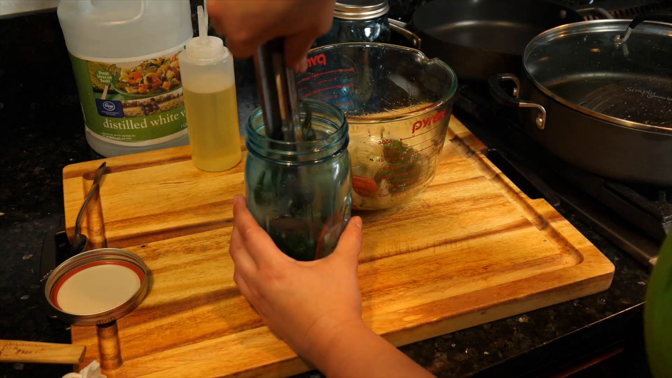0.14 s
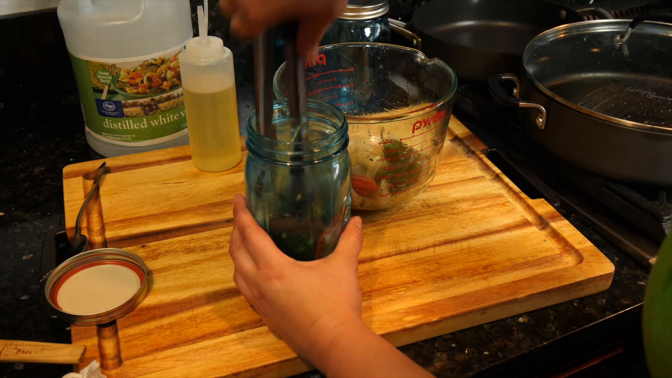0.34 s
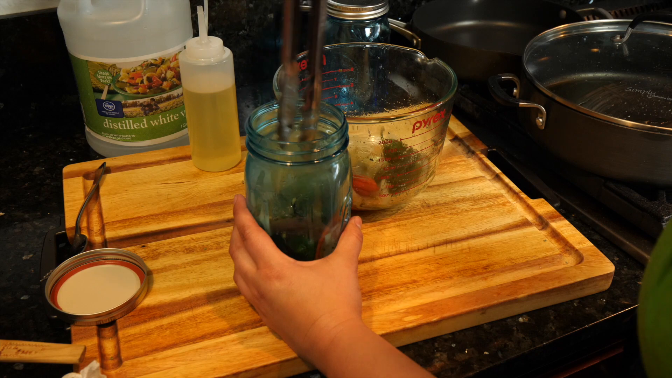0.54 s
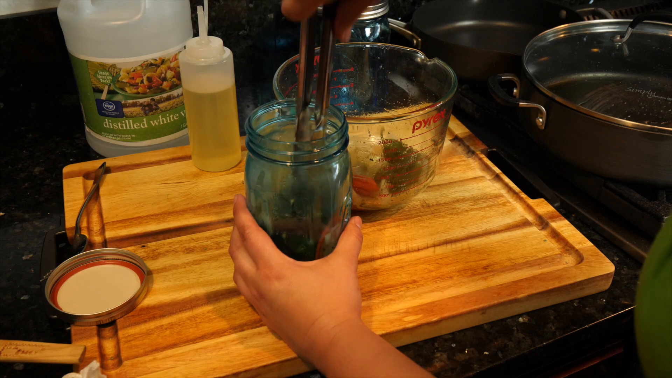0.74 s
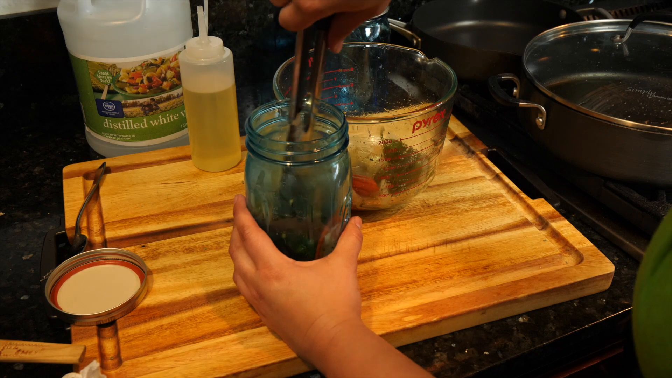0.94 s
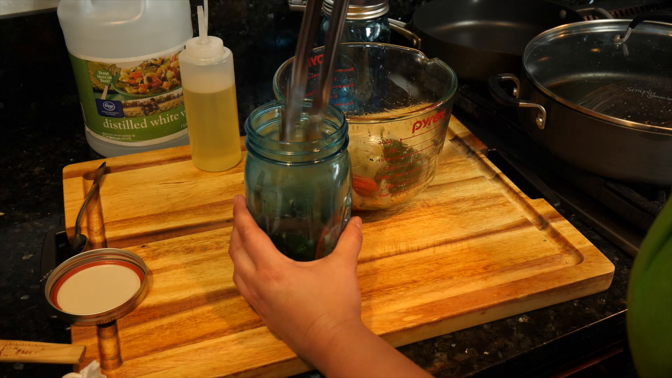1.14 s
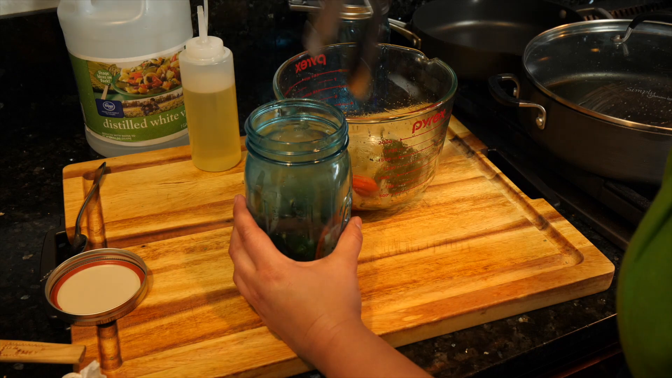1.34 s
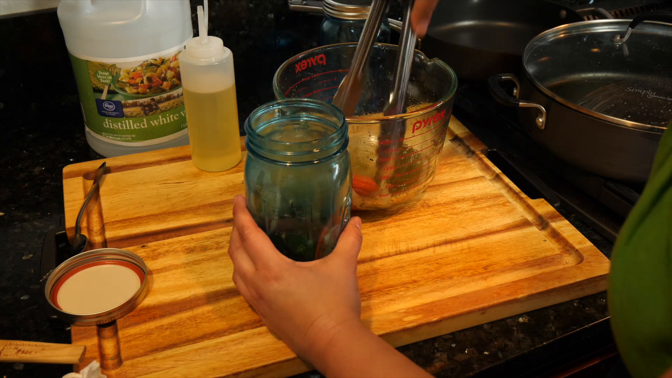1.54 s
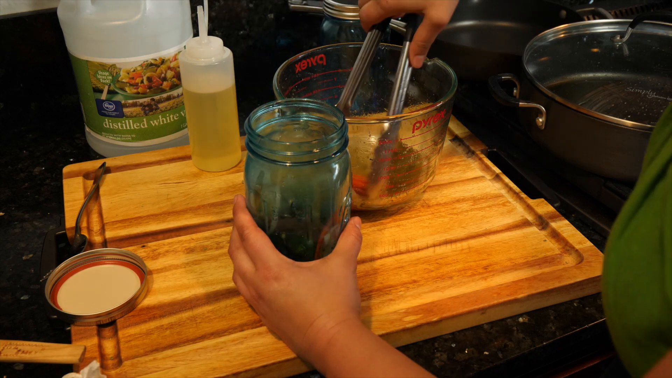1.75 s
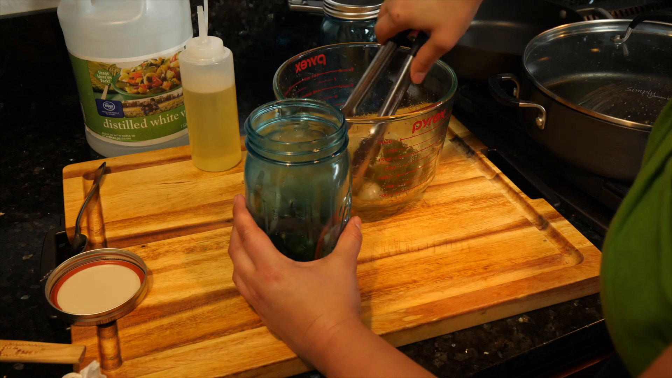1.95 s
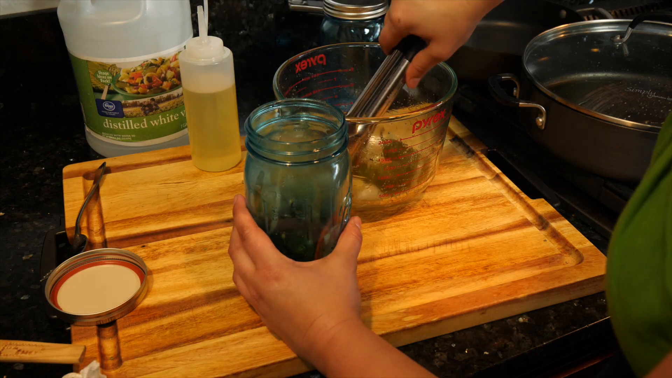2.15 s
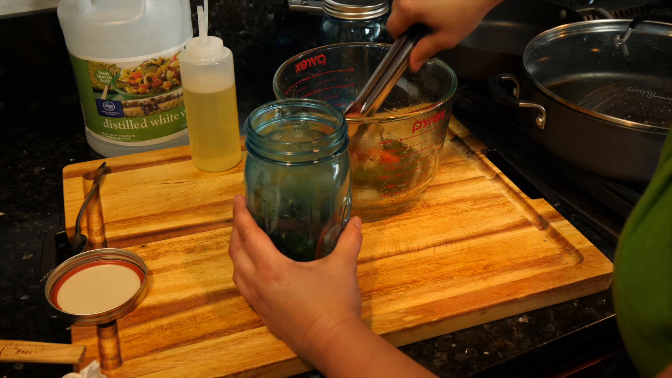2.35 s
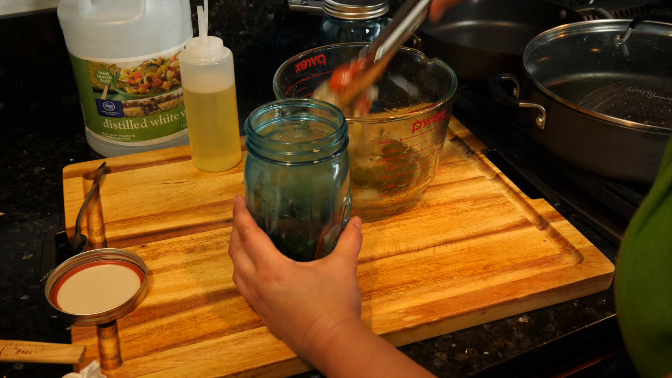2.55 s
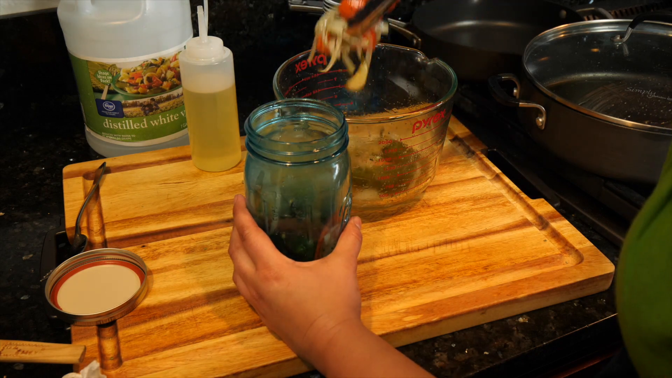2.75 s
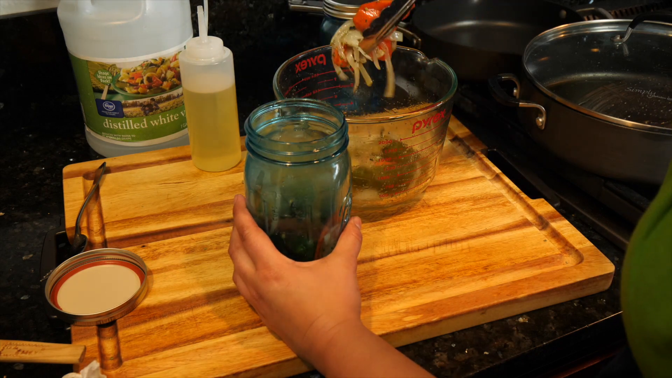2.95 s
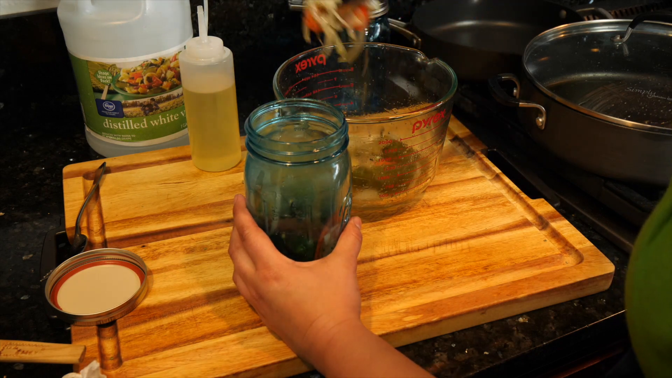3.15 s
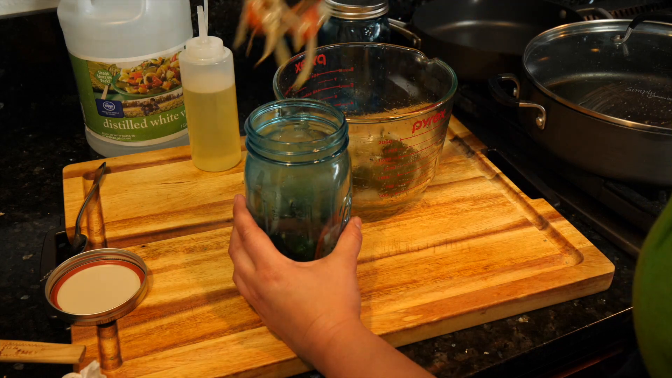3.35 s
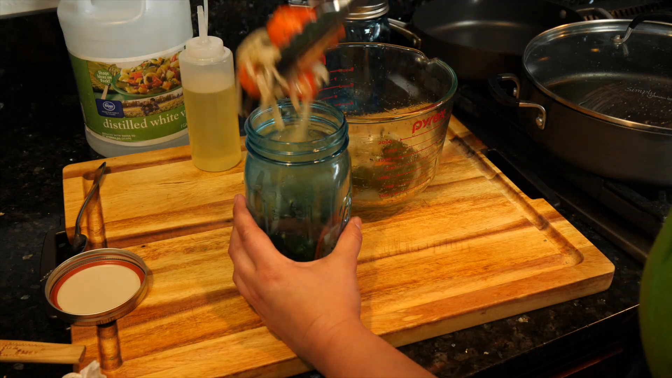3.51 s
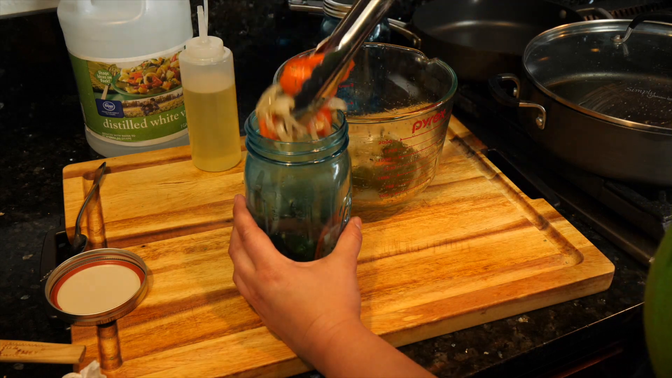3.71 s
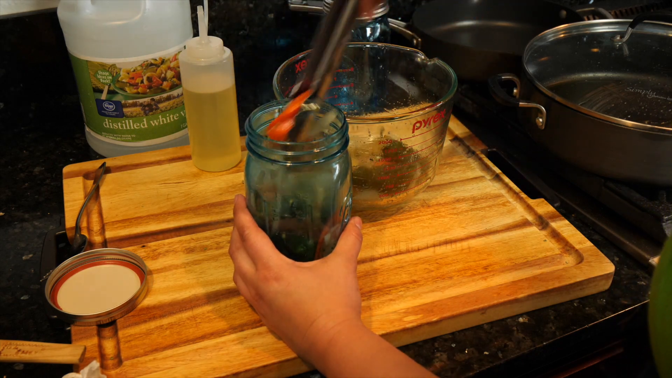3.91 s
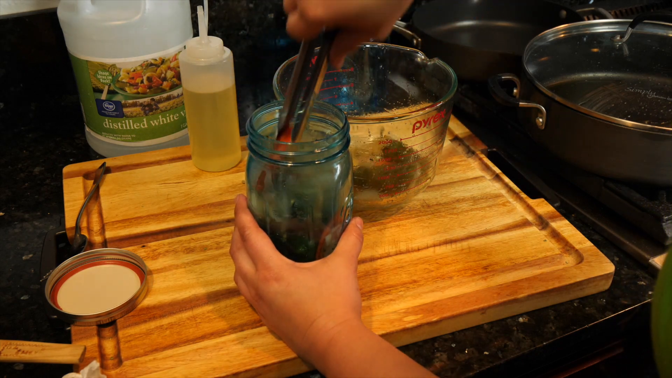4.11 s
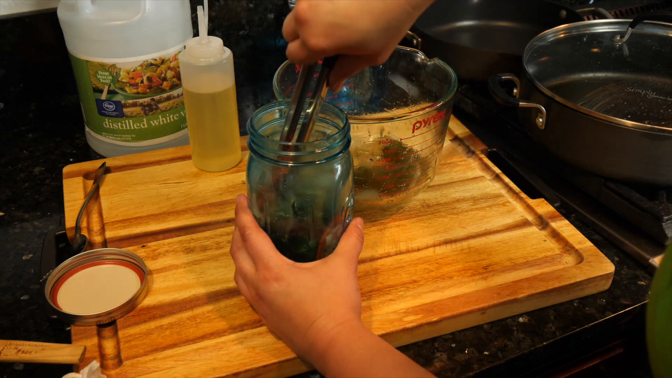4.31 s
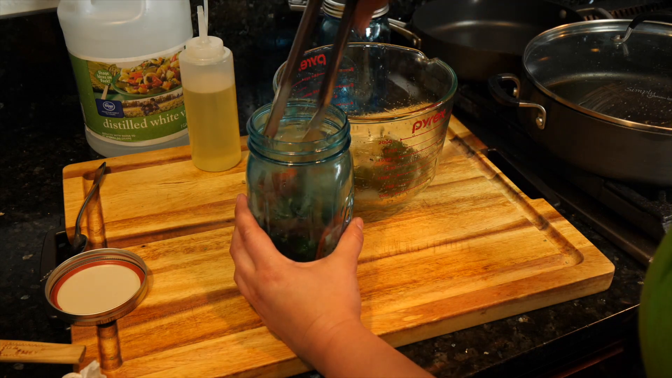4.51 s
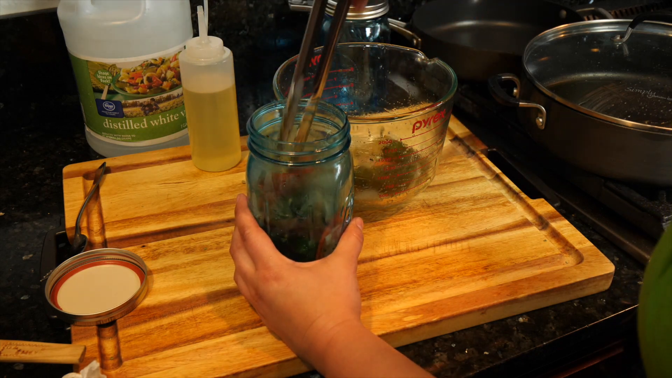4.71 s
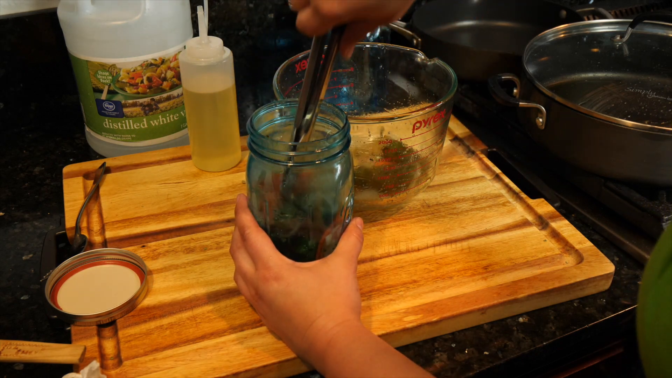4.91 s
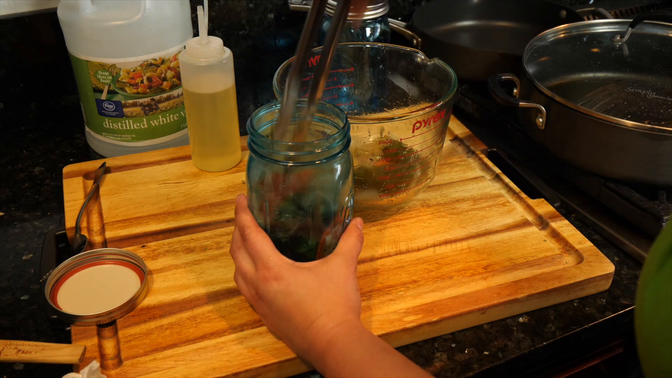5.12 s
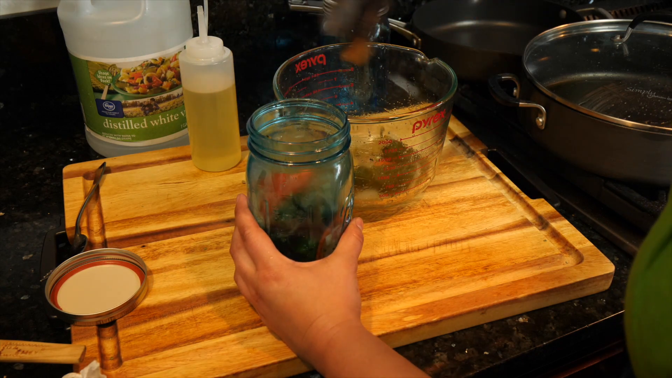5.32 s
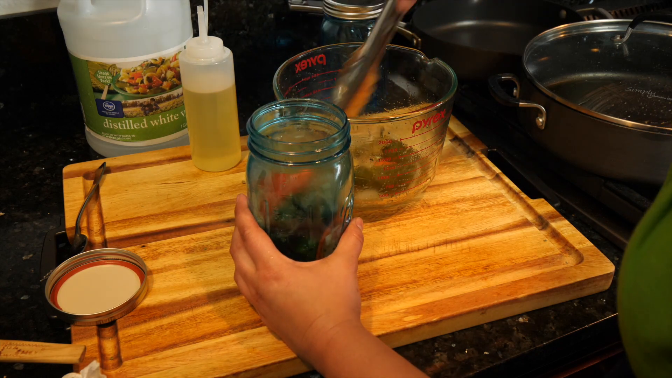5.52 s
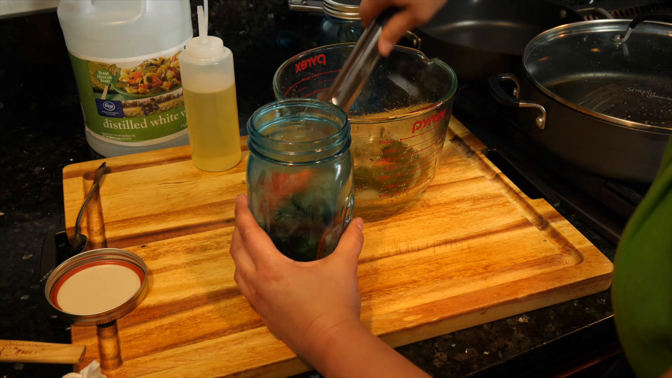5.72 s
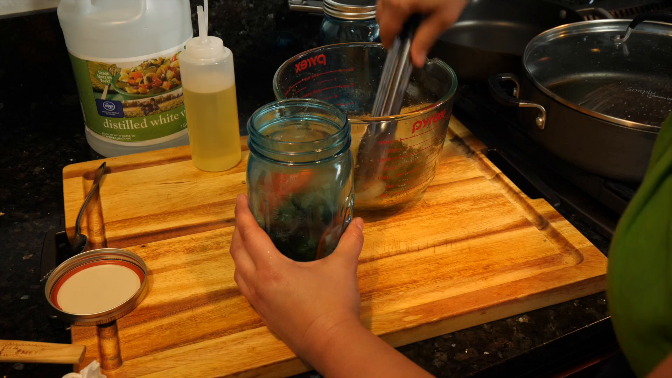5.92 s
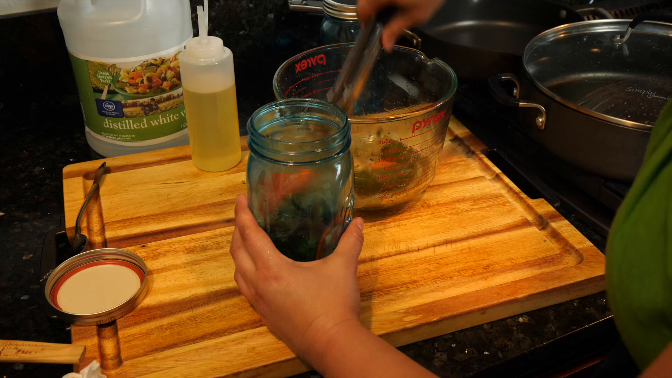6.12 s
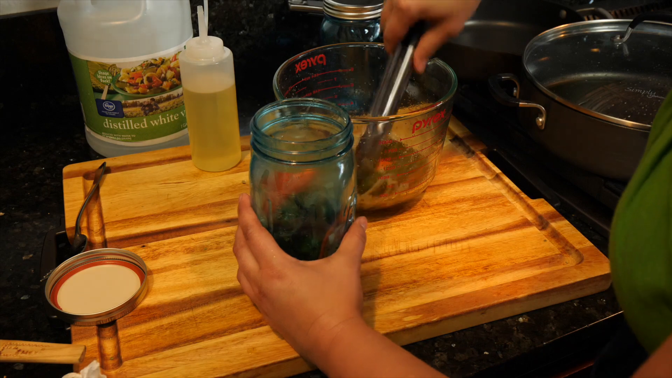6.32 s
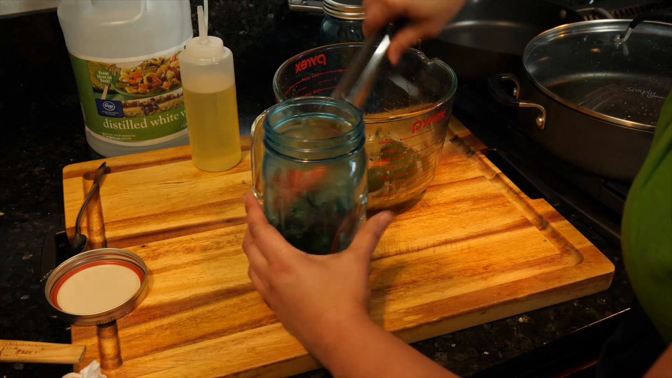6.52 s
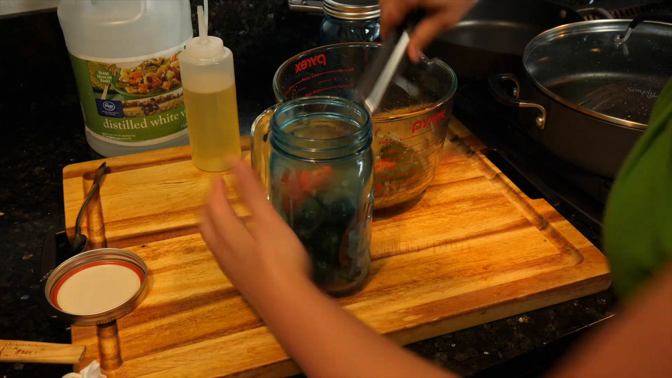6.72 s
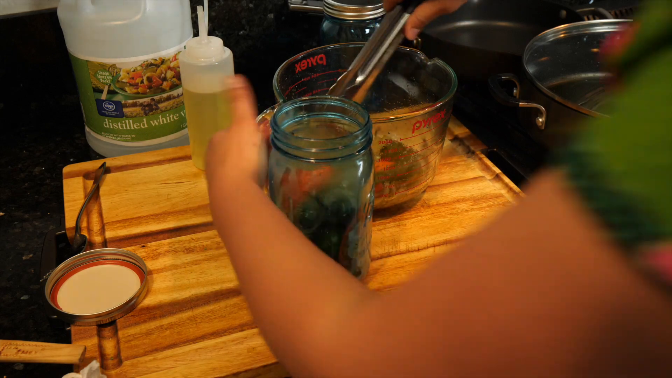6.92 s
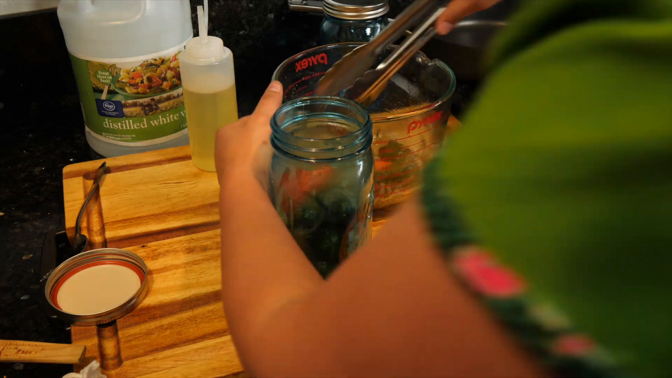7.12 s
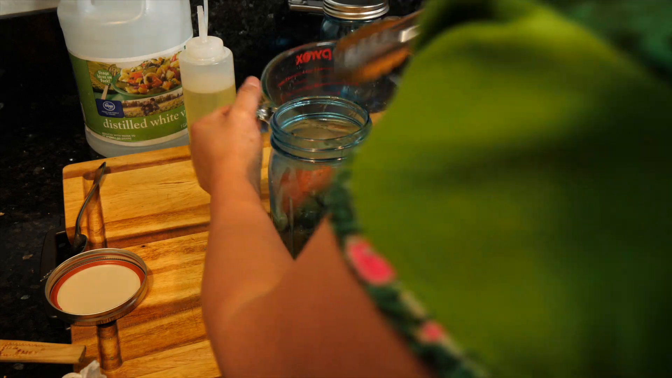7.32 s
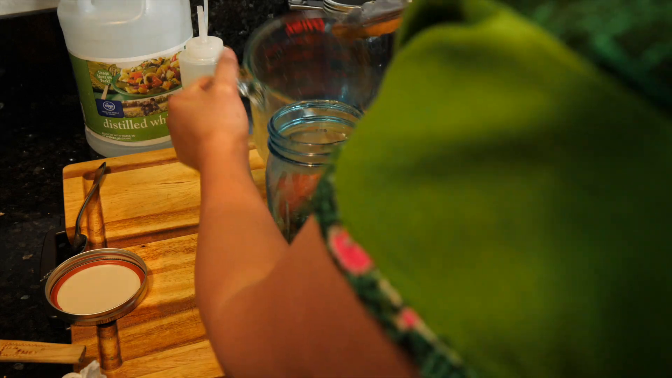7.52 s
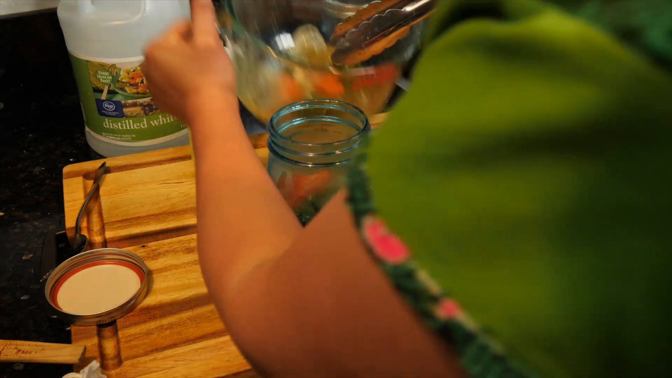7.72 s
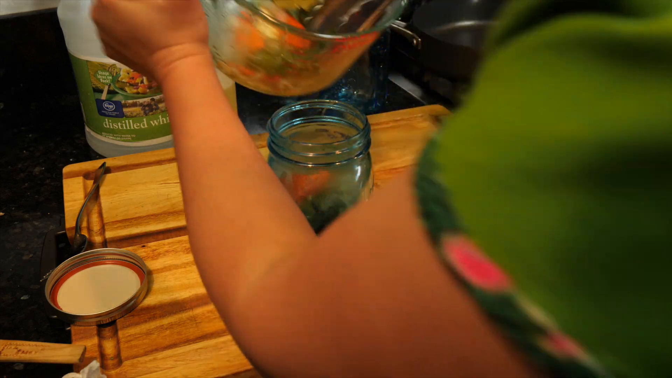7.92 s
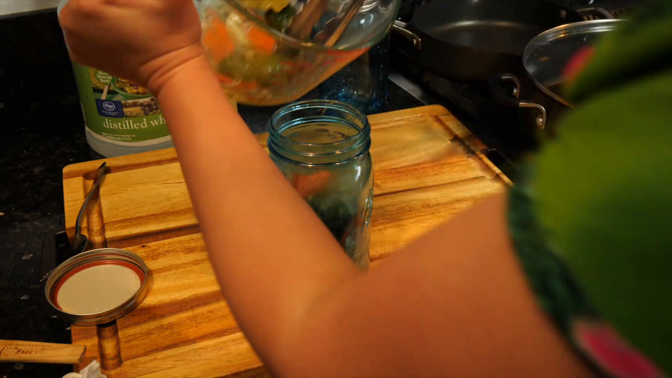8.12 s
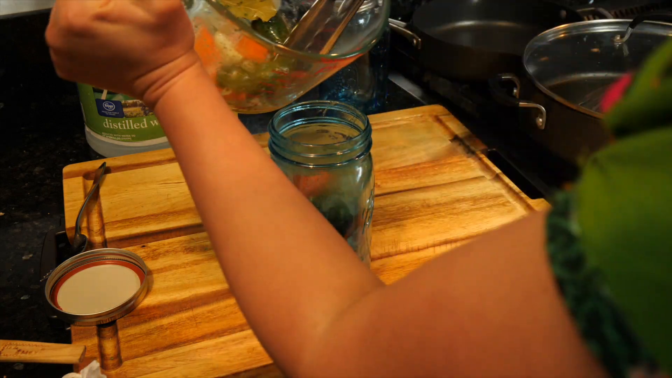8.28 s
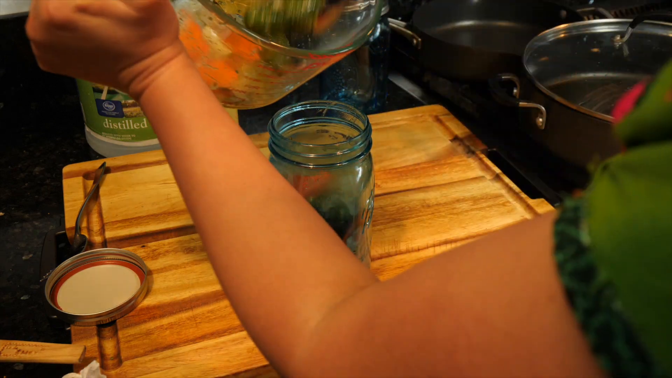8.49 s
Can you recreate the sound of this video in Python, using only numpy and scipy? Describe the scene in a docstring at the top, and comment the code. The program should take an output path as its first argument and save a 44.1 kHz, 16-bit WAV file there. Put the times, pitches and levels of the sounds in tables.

```python
"""In a hard-walled kitchen, steel tongs pack vegetables from a glass bowl into a jar on a wooden board.
Impacts excite the damped modes of steel and glass: the tongs clink and tick, and the lifted bowl knocks
against an empty jar. Friction makes the tongs scrape, the vegetables rustle and the bowl skid.
A refrigerator hums over the room noise, and the walls reverberate. The microphone is almost mono
and clips on the loudest knocks."""
import sys
import numpy as np
from scipy import signal
from scipy.fft import rfft, irfft
from scipy.io import wavfile

SR = 44100
rng = np.random.default_rng(int(sys.argv[2]) if len(sys.argv) > 2 else 0)


def output_pcm(signal):
    """Save a mono or channel-first signal as 16-bit PCM at the path in sys.argv[1].

    Samples are clipped to [-1, 1] before scaling.
    """
    pcm = np.clip(np.atleast_2d(signal).T, -1, 1) * 32767
    wavfile.write(sys.argv[1], SR, np.round(pcm).astype(np.int16))


N = 377055


def from_db(db):
    """Amplitude grows tenfold for every 20 dB."""
    return 10 ** (np.asarray(db) / 20)


def rms_one(x):
    """Normalisation: a signal divided by its rms has unit power."""
    return x / np.sqrt(np.mean(x ** 2) + 1e-20)


def add(out, start_s, sound):
    """Superposition: a sound adds to those already present."""
    i = round(start_s * SR)
    out[i:i + len(sound)] += sound[:N - i]


def radiate(x, cutoff_hz):
    """Radiation efficiency: a small body is a poor source of bass, so it acts as a high-pass."""
    return signal.sosfilt(signal.butter(3, cutoff_hz, "high", fs=SR, output="sos"), x)


def coloured_noise(spectrum):
    """Spectral shaping: white noise weighted by frequency, then scaled to rms 1."""
    hz, db = np.transpose(spectrum)
    grid = np.maximum(np.fft.rfftfreq(N, 1 / SR), 1)
    gain = from_db(np.interp(np.log(grid), np.log(hz), db, left=-90, right=-90))
    return rms_one(irfft(rfft(rng.standard_normal(N)) * gain, N))


# Room noise. Each row: frequency in Hz, relative spectral density in dB.
ROOM_SPECTRUM = [(12, -53), (20, -9.5), (91, -3), (108, -4), (147, -5), (251, 0), (351, -3), (382, -4.5),
                 (440, -4.5), (1110, -22), (3050, -28), (4280, -26), (7090, -31.5), (15100, -33.5),
                 (16500, -61.5)]
# Refrigerator motor. Each row: frequency in Hz, rms level in dB.
MOTOR_HARMONICS = [(120, -65.5), (240, -66.5)]


def room_and_refrigerator():
    """Periodic vibration of a motor sets harmonic lines on the continuous spectrum of the room."""
    t = np.arange(N) / SR
    hum = sum(np.sqrt(2) * from_db(db) * np.sin(2 * np.pi * hz * t) for hz, db in MOTOR_HARMONICS)
    return from_db(-58) * coloured_noise(ROOM_SPECTRUM) + hum


def ringing(modes, emphasis_db=0, spread_db=3.0, ring_share=1):
    """Free vibration: a struck body sounds as a sum of damped sines, each falling 60 dB in its T60."""
    hz, db, t60 = np.transpose(modes)
    t60 = t60 * ring_share
    t = np.arange(int(1.2 * t60.max() * SR) + 64) / SR
    gains = from_db(db + emphasis_db + spread_db * rng.standard_normal(len(hz)))
    gains = gains / np.sqrt(np.sum(gains ** 2)) * (-1) ** np.arange(len(hz))
    decays = from_db(-60 * t / t60[:, None])
    return gains @ (decays * np.sin(2 * np.pi * hz[:, None] * t))


def octaves_above(modes, reference_hz):
    """Each doubling of frequency puts a mode one octave higher."""
    return np.log2(np.array(modes)[:, 0] / reference_hz)


def favour(modes, centre_hz, fall_db_per_octave, rounding_octaves=0):
    """Selective excitation: the point of contact decides which modes ring most; weights in dB."""
    return -fall_db_per_octave * np.hypot(octaves_above(modes, centre_hz), rounding_octaves)


def rebounds(decay_ms):
    """Contact bounce: a first impulse and a dense, dying chatter of random ones, of total energy 1."""
    chance, size = rng.random((2, 2000))
    decay = np.exp(-np.arange(2000) / SR / (decay_ms / 1000))
    force = (chance < .2) * (2 * size - 1) * decay
    force[0] = 1.0
    return force / np.sqrt(np.sum(force ** 2))


# Mean strength of the modes of thin steel. Each row: frequency in Hz, relative level in dB.
STEEL_SPECTRUM = [(800, -15.5), (1300, -25), (2200, -11.5), (4000, -2.5), (7000, -2), (10000, -4),
                  (16000, -8)]


def clatter(centre_hz, fall_db_per_octave, cycles=40):
    """High modal density: crowded, short-lived modes shift with the grip at every touch."""
    hz = np.geomspace(700, 15500, 70) * 2 ** rng.uniform(-.05, .05, 70)
    steel_hz, steel_db = np.transpose(STEEL_SPECTRUM)
    db = np.interp(np.log(hz), np.log(steel_hz), steel_db)
    t60 = np.minimum(cycles / hz, .03)
    modes = np.transpose([hz, db, t60])
    emphasis_db = favour(modes, centre_hz, fall_db_per_octave, rounding_octaves=0.33)
    return ringing(modes, emphasis_db, spread_db=5.0)


# Modes of the thud and the empty jar. Each row: frequency in Hz, relative level in dB, T60 in seconds.
THUD_MODES = [(110, -16, 0.06), (195, -15, .06), (472.5, -2, 0.055), (824, 3.5, 0.017), (980, -4.5, 0.066),
              (1109, -5.5, 0.043)]
EMPTY_JAR_MODES = [(1468, 3.5, 0.033), (1958, 3.5, 0.076), (2590, -3.5, 0.13), (2850, -7.5, 0.069),
                   (4390, -12.5, .07), (4312, -3, 0.29), (5966, 20, 0.084), (5915, -18, 0.07),
                   (6700, 22, 0.033)]
# Glass meets glass or board. Each row: start in seconds, thud level in dB, its tilt in dB per octave,
# clack level in dB, its centre in Hz, empty jar level in dB, its favoured frequency in Hz.
GLASS_KNOCKS = [(0.016, -26.5, -17, -51, 980, -68.5, 1982), (0.027, -26, -21, -40.5, 960, -72, 1980),
                (7.075, -52, -21, -35, 2190, -45, 1910), (7.124, -43, -12, -44, 1410, -53, 1465),
                (7.257, -42, -11, -42, 1500, -46, 1465), (7.407, -6.5, 0.5, 2.5, 2370, -14.5, 5370),
                (7.419, -45, -18, -2, 1630, -7, 1370), (7.451, -19, -32, -21.5, 905, -20, 1460),
                (8.2393, -6.8, 22, -7.5, 1140, -12.5, 1960), (8.244, -5, 0, -11, 2600, -22.5, 6230)]


def glass_knocks():
    """Impact excitation: heavy glass gives a hollow thud and a dry clack, and the empty jar rings."""
    out = np.zeros(N)
    lowest_hollow_hz = THUD_MODES[2][0]
    thud_octaves = np.maximum(octaves_above(THUD_MODES, lowest_hollow_hz), 0)
    for start_s, thud_db, thud_tilt, clack_db, clack_hz, jar_db, jar_hz in GLASS_KNOCKS:
        thud = ringing(THUD_MODES, thud_tilt * thud_octaves)
        clack = signal.fftconvolve(clatter(clack_hz, fall_db_per_octave=21), rebounds(decay_ms=10))
        jar = ringing(EMPTY_JAR_MODES, favour(EMPTY_JAR_MODES, jar_hz, fall_db_per_octave=22))
        add(out, start_s, from_db(thud_db) * thud)
        add(out, start_s, from_db(clack_db) * clack)
        add(out, start_s, from_db(jar_db) * jar)
    return out


STEEL_CUTOFF_HZ, VESSEL_CUTOFF_HZ, BOARD_CUTOFF_HZ = 1280, 200, 112.6   # weak radiation below these
# Modes of the jar, the bowl, and either vessel rocking on the board.
# Each row: frequency in Hz, relative level in dB, free T60 in seconds.
JAR_MODES = [(1890, -4.5, 0.49), (1900, -14.5, .5), (1945, -0.5, .12), (2190, -19.5, 0.15),
             (3403, -13.5, .15), (3960, -5.5, 0.1), (4640, -9.5, 0.14), (5870, -14, .15),
             (5950, -6.5, 0.065)]
BOWL_MODES = [(600, -2.5, 1.23), (637, 5.5, 0.1), (1150, -24, 1.3), (1255, 6, 0.097), (1437, -2, 0.77),
              (1808, -38, 0.037), (1770, -4, 0.27), (2213, -8.5, 0.24), (2600, 3, 0.31), (3240, -6, 0.38),
              (3710, -33, 0.166), (3241, -29, 0.26), (4550, -27, 0.14), (4980, -40.5, 0.32),
              (6030, -26, .2), (6256, -7, 0.31)]
ROCKING_MODES = [(280, -14, 0.078), (430, 0, 0.013), (525, 6.5, 0.019), (660, -7, 0.0077), (860, -4, 0.04)]
# The tongs strike jar and bowl. Each row: start in seconds, clatter level in dB, its centre in Hz,
# its fall in dB per octave, rocking level in dB, glass level in dB, glass tilt in dB per octave
# (before limiting), share of the free ring time.
JAR_STRIKES = [(0.251, -62.5, 4373, 8.5, -47.5, -52, 2.5, 0.34), (0.2937, -19, 4666, 9, -34.5, -39, 6, 1),
               (0.3199, 4.5, 4643, 3, -20.5, -23, -1.5, 0.93), (0.4353, -6, 5105, 6.5, -31, -23, 6, 0.64),
               (0.4761, -6.5, 4014, 6.5, -32.5, -16, -1, 0.78), (1.0313, -23, 3440, -0.5, -41, -69, 6, .8),
               (4.4845, 0.5, 4430, 10, -17, -37.5, 5.5, 0.94),
               (4.492, 0.5, 3750, -0.5, -21.5, -28.5, -3.5, 1),
               (4.5296, 1, 4050, -14, -20.5, -16, 12, 0.83), (4.5585, -3, 5000, -1, -28.5, -26.5, -7, 0.34),
               (4.988, -28, 6030, 12, -56, -36.5, 6, 0.18)]
BOWL_STRIKES = [(1.7485, -32.5, 6100, 4, -48, -51, -2, 0.6), (2.0931, -18.5, 3470, 29, -43, -27.5, 1, 0.27),
                (2.1482, -28, 3180, 3, -48, -44, -16, 1), (2.2681, -29.5, 3368, 6, -68.5, -60, 22, 0.92),
                (5.879, -13, 4170, 3, -23, -29.5, -5, .4), (5.8992, -15, 6000, 11, -26, -40.5, -13, 0.33),
                (5.9341, -27, 6700, 11, -29.5, -33.5, -4.5, 0.58),
                (5.9544, -27, 6960, 19, -43, -49.5, -15, 1), (6.2886, -28, 4000, 11, -28, -30, -17, 0.3),
                (6.3125, -26, 3600, 27, -51, -48.5, -1, 0.87), (6.6291, 5, 3650, 6.5, -8.5, -25.5, 2.6, 1),
                (7.865, 3, 3940, 5.5, -19.5, -8, 0.5, 0.13), (7.9181, -12.5, 4357, 10, -56, -26.5, 9, 0.35),
                (8.0264, -6, 5560, 18, -30, -39, 10, 0.77)]


def tong_clinks(strikes, glass_modes):
    """Damped resonance: a blow rings steel and glass and rocks the vessel; hand and filling damp it."""
    steel, vessel = np.zeros((2, N))
    glass_octaves = octaves_above(glass_modes, glass_modes[0][0])
    for start_s, steel_db, centre_hz, fall, rocking_db, glass_db, tilt, share in strikes:
        force = rebounds(decay_ms=9.5)
        tongs = signal.fftconvolve(clatter(centre_hz, fall), force)
        rocking = signal.fftconvolve(ringing(ROCKING_MODES), force)
        hardness_db = np.clip(tilt, -12, 6) * glass_octaves   # harder contact favours upper modes
        glass = ringing(glass_modes, hardness_db, ring_share=share)
        add(steel, start_s, from_db(steel_db) * tongs)
        add(vessel, start_s, from_db(rocking_db) * rocking)
        add(vessel, start_s, from_db(glass_db) * glass)
    return radiate(steel, STEEL_CUTOFF_HZ) + radiate(vessel, VESSEL_CUTOFF_HZ)


# Light touches of the tongs. Each row: start in seconds, relative level in dB, centre in Hz.
TONG_TOUCHES = [(0.262, -31, 4500), (0.8074, -34, 5300), (0.8295, -34.5, 4220), (0.8525, -38, 5100),
                (0.9313, -35, 4550), (0.9732, -32.5, 3360), (1.1127, -40, 3620), (1.1697, -45, 2110),
                (1.784, -39, 5730), (1.826, -43.5, 3280), (1.946, -38, 4240), (2.0208, -32, 3420),
                (2.383, -34.5, 2720), (2.9684, -39.5, 3100), (3.287, -40.5, 3830), (3.8542, -44, 3500),
                (4.0367, -43, 6640), (4.054, -42.5, 5500), (4.1147, -39.5, 3820), (4.146, -36, 4130),
                (4.1859, -34.5, 4580), (4.2126, -41, 5260), (4.2245, -34.5, 5300), (4.2662, -27.5, 3020),
                (4.308, -23.5, 3560), (4.3312, -34, 4400), (4.342, -25.5, 3570), (4.454, -31, 4240),
                (4.8642, -40, 3330), (5.1532, -42.5, 3430), (5.8178, -30.5, 3820), (5.8556, -36, 4060),
                (6.33, -28.5, 3900), (6.3459, -23.5, 3120), (6.4966, -37.5, 3750), (6.606, -30, 4460),
                (6.836, -33.5, 3240), (8.1504, -28.5, 3920), (8.1816, -32, 3260), (8.2136, -25, 2170),
                (8.3385, -21.5, 2030), (8.3913, -27.5, 4450), (8.4343, -25, 2676)]


def tong_ticks():
    """Transient response: lightly touched steel gives a brief clatter around one pitched ping."""
    out = np.zeros(N)
    for start_s, db, centre_hz in TONG_TOUCHES:
        steel = clatter(centre_hz, fall_db_per_octave=3.5, cycles=30)
        tick = signal.fftconvolve(steel, rebounds(decay_ms=6.8))
        ping = ringing([(centre_hz, 0, .035)])
        add(out, start_s, from_db(db + 1) * tick)
        add(out, start_s, from_db(db - 14.5) * ping)
    return radiate(out, STEEL_CUTOFF_HZ)


# Rustle of wet vegetables. Each row: frequency in Hz, relative spectral density in dB.
RUSTLE_SPECTRUM = [(150, -6), (300, 8), (1000, -1.5), (3000, -9.5), (6000, -20)]
# Tongs and vegetables slide on glass. Each row: time of the peak in seconds, 20 dB swell time and
# 20 dB fade time in seconds, scrape level in dB, rustle level in dB.
SLIDING_STROKES = [(0.271, 0.052, 0.12, -53, -51), (0.832, 0.041, 0.047, -64, -61),
                   (1.038, 0.24, 0.0083, -52.5, -52), (1.09, .06, 0.9, -70, -62.5),
                   (1.5, 0.06, 0.12, -71, -48), (1.755, .05, 0.21, -73, -69), (2.089, 0.13, .09, -44, -46),
                   (2.266, 0.032, 0.069, -51, -78), (3.6, .3, 0.56, -84, -67),
                   (4.144, 0.081, 0.43, -65.5, -59.5), (4.344, 0.11, 0.023, -45.5, -52),
                   (4.457, 0.032, 0.04, -45.5, -64), (4.992, 0.07, 0.17, -60, -57),
                   (5.819, .05, 0.18, -60, -68), (6.292, 0.018, 0.063, -71, -61),
                   (6.359, 0.18, .06, -52.5, -64), (6.6, 0.2, 0.09, -58, -55.5),
                   (7.08, 0.02, 0.082, -77, -52), (7.31, 0.42, 0.9, -64.5, -54)]


def scrape_and_rustle():
    """Sliding friction: dense, uneven slips excite the steel while wet vegetables rustle below."""
    t = np.arange(N) / SR
    scrape_level, rustle_level = np.zeros((2, N))
    for peak_s, swell_s, fade_s, scrape_db, rustle_db in SLIDING_STROKES:
        stroke = from_db(-20 * np.maximum((peak_s - t) / swell_s, (t - peak_s) / fade_s))
        scrape_level += from_db(scrape_db) * stroke
        rustle_level += from_db(rustle_db) * stroke
    slip_db = 5.0 * np.minimum(rng.exponential(1, N), 4)
    slip_sizes = from_db(slip_db) * rng.choice([-1, 1], N)
    slips = (rng.random(N) < 1100 / SR) * slip_sizes   # about 1100 slips a second
    steel = clatter(centre_hz=3100, fall_db_per_octave=4.5, cycles=17)
    scrape = rms_one(signal.fftconvolve(slips, steel)[:N])
    return scrape_level * scrape + rustle_level * coloured_noise(RUSTLE_SPECTRUM)


# The bowl skids on the board. Each row: start in seconds, half the duration in milliseconds,
# first mode level in dB, overtone level in dB.
BOWL_SHUDDERS = [(1.991, 4.9, -41.5, -72), (2.011, 8.9, -41.5, -60), (2.028, 8.4, -33.5, -44.5),
                 (2.061, 11, -22.5, -28.5), (2.078, 13, -26.5, -35), (2.155, 11, -46, -70)]


def bowl_skids(board_hz=529, overtone_ratio=1.94):
    """Friction-driven vibration: each hollow shudder swells and dies on two modes of the board."""
    out = np.zeros(N)
    for start_s, half_ms, first_db, overtone_db in BOWL_SHUDDERS:
        t = np.arange(int(2 * half_ms / 1000 * SR)) / SR
        progress = t / t[-1]
        swell = progress * (1 - progress) ** 2 * 27 / 4   # reaches 1 a third of the way through
        phase = 2 * np.pi * board_hz * t
        modes = from_db(first_db) * np.sin(phase) + from_db(overtone_db) * np.sin(overtone_ratio * phase)
        add(out, start_s, swell * modes)
    return out


# Decay of sound in the kitchen. Each row: frequency in Hz, T60 in seconds.
REVERBERATION_TIMES = [(100, 1), (500, 0.65), (2000, 0.67), (5000, 0.45), (9000, 0.5), (15000, 0.057)]


def kitchen_reverberation(x, build_up_s=0.0096, reverb_treble_cutoff_hz=8100):
    """Diffuse field: reflections merge into noise, each octave dying at its own rate; two channels."""
    t, tails = np.arange(SR) / SR, 0
    room_hz, room_t60 = np.transpose(REVERBERATION_TIMES)
    for hz in 62.5 * 2 ** np.arange(9):
        edges_hz = [hz / np.sqrt(2), min(hz * np.sqrt(2), .45 * SR)]
        band = signal.butter(4, edges_hz, "band", fs=SR, output="sos")
        t60 = np.interp(np.log(hz), np.log(room_hz), room_t60)
        tails = tails + signal.sosfilt(band, rng.standard_normal((2, SR))) * from_db(-60 * t / t60)
    tails = signal.sosfilt(signal.butter(2, reverb_treble_cutoff_hz, fs=SR, output="sos"), tails)
    tails = tails * np.clip(t / build_up_s, 0, 1) ** 2
    tails = tails / np.sqrt(np.sum(tails[0] ** 2))
    return signal.fftconvolve(tails, x[None])[:, :N]


# Hiss that differs between the channels. Each row: frequency in Hz, relative spectral density in dB.
SIDE_HISS_SPECTRUM = [(12, -35), (20, 0), (111, -1), (164, -17.5), (478, -2), (520, -9.5), (12400, -11),
                      (15100, -5), (16500, -25)]


def scene():
    """Mid-side stereo: all sources lie in the middle; faint reverberation and hiss add some width."""
    direct = tong_clinks(JAR_STRIKES, JAR_MODES) + tong_ticks()
    direct += tong_clinks(BOWL_STRIKES, BOWL_MODES)
    direct += radiate(glass_knocks() + bowl_skids() + scrape_and_rustle(), BOARD_CUTOFF_HZ)
    reverb_mid, reverb_side = kitchen_reverberation(direct)
    mid = direct + from_db(-16) * reverb_mid + room_and_refrigerator()
    side = from_db(-65.5) * reverb_side + from_db(-78.5) * coloured_noise(SIDE_HISS_SPECTRUM)
    return np.array([mid + side, mid - side])


def record(dry):
    """Overload and band limiting: the loudest peaks clip, then a steep low-pass cuts the top."""
    stopband_hz = 16600
    low_pass = signal.cheby2(18, 90, stopband_hz, fs=SR, output="sos")
    return signal.sosfilt(low_pass, np.clip(dry, -1, 1))


dry = scene()
out = record(dry)
output_pcm(out)
```